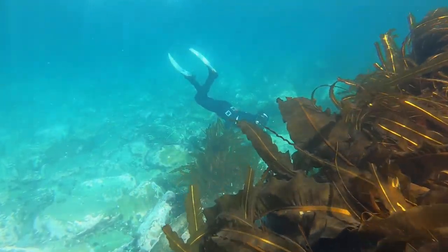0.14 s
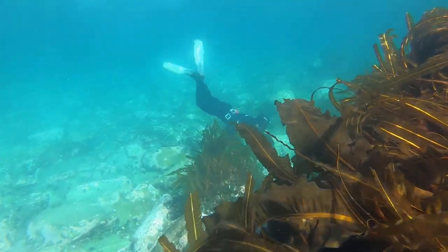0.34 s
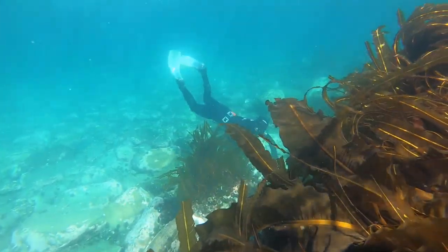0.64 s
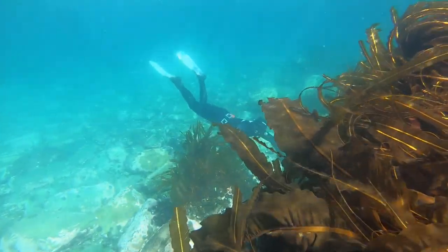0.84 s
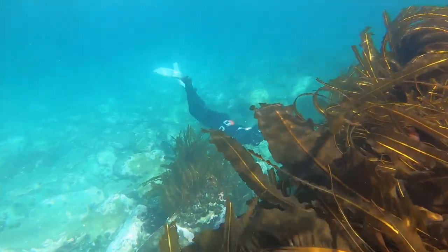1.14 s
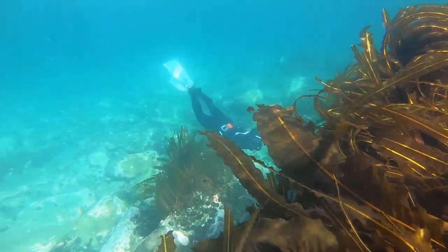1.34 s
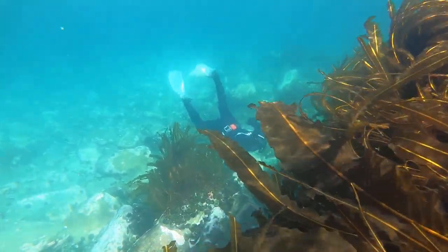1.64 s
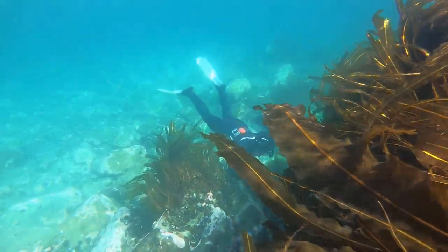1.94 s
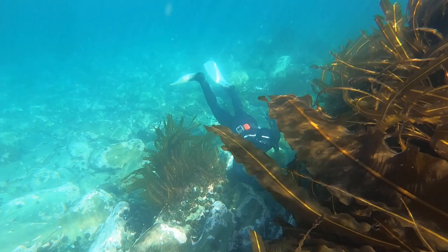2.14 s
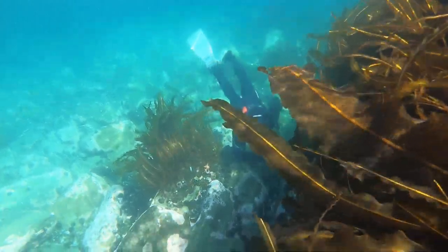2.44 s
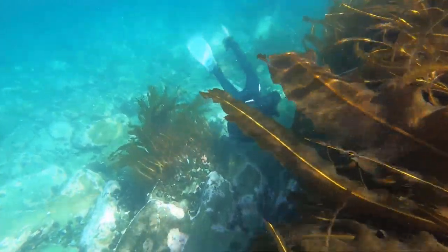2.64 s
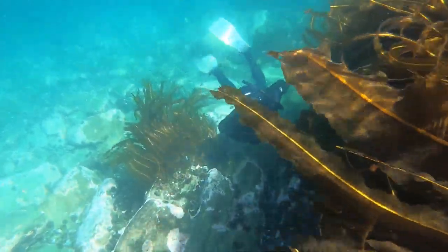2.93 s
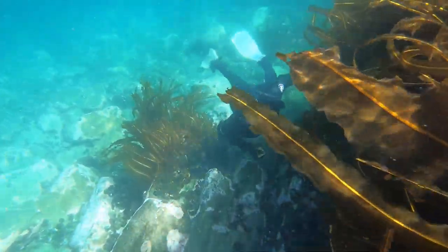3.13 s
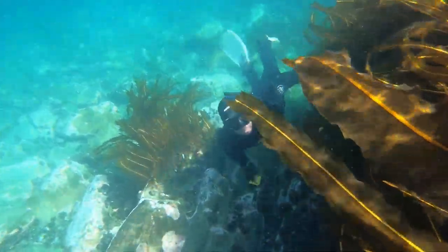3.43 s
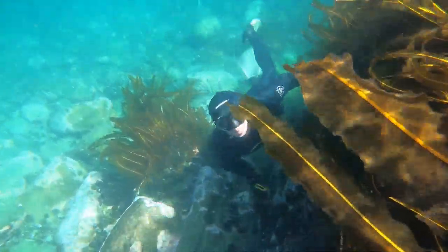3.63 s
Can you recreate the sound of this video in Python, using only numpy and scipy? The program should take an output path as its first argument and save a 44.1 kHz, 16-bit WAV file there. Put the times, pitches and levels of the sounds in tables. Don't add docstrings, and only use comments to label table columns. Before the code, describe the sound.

Muffled water gurgles and hollow bubble blips close by, over soft low rumbling lumps underwater.

```python
import sys
import numpy as np
from scipy import signal
from scipy.fft import rfft, irfft, next_fast_len
from scipy.io import wavfile
from scipy.ndimage import uniform_filter1d, map_coordinates

SR = 44100
rng = np.random.default_rng(int(sys.argv[2]) if len(sys.argv) > 2 else 0)


def nominal_scale(level):
    x = np.asarray(level, float) / 20
    return 10 ** x


def pcm_store(signal):
    levels = np.round(np.clip(np.atleast_2d(signal), -1, 1) * 32767)
    wavfile.write(sys.argv[1], SR, levels.astype(np.int16).T)


N = 166698

# f/Hz, level/dB
HISS_COLOUR = [(3000, -120), (6000, 1), (8500, -6.5), (10000, -6.5), (12500, -10), (14500, -23),
               (15600, -30)]
# f/Hz, level/dB
WASH_COLOUR = [(40, -75), (100, -19), (200, -11), (450, -16), (1300, -15), (3000, -21.5), (4200, -26.5),
               (6500, -20.5), (8600, -33.5), (11000, -49)]
# f/Hz, level/dB
RUMBLE_COLOUR = [(8.8, -51), (15, 5), (47, 3), (67, -6), (100, -24), (130, -14.5), (180, -50), (310, -120)]
# t/s of the peak, length/s, level/dB, f/Hz
SURGES = [(0.086, 0.023, -45, 33.6), (0.151, 0.033, -47, 40), (0.314, 0.026, -35, 43.7),
          (0.364, 0.026, -44, 64.5), (0.436, 0.036, -42, 45.5), (0.507, 0.026, -47.5, 43.3),
          (0.571, 0.022, -53, 31.2), (1.116, 0.024, -51.5, 55.3), (1.246, 0.011, -45, 51.6),
          (1.302, 0.032, -38.5, 43), (1.524, 0.081, -51.5, 32.8), (1.654, 0.023, -48, 33.2),
          (1.72, 0.041, -42, 44), (1.863, 0.016, -47, 35.4), (1.912, 0.09, -47.5, 30.4),
          (1.999, 0.027, -41.5, 32.2), (2.126, 0.076, -43, 33), (2.24, 0.029, -48, 32),
          (2.311, 0.03, -43.5, 32.8), (2.497, 0.03, -46, 58.3), (2.547, 0.015, -48, 30.3),
          (3.07, 0.034, -55, 27), (3.302, 0.07, -52, 36.4), (3.413, 0.038, -39.5, 38.5),
          (3.524, 0.014, -45, 61.4), (3.707, 0.034, -49, 34)]
# t/s, level/dB, time to fade by 60 dB/s
SPRAYS = [
    (0.2261, -48.5, 0.024),
    (1.35, -62, 0.2),
    (2.075, -57, 0.11),
    (2.097, -53, 0.073),
    (2.704, -65, .12),
    (3.358, -56, 0.085),
    (3.729, -56.5, 0.15),
]
# f/Hz, level/dB
SPRAY_COLOUR = [(200, -120), (900, -11), (2000, 7.5), (3400, -3.5), (4200, -9.5), (5500, -4), (8000, -19.5),
                (9200, -120)]
# t/s, peak level/dB, f/Hz
FAINT_TICKS = [(0.27, -51.5, 7100), (0.502, -57, 7100), (0.537, -58, 7230), (0.783, -53, 7270),
               (1.277, -54, 5280), (1.346, -51, 5800), (1.847, -54.5, 7640), (2.097, -56, 5170),
               (2.192, -54.5, 5510), (2.657, -57.5, 5340), (3.14, -59, 5350), (3.209, -58, 5100),
               (3.487, -57, 5400), (3.606, -44.5, 5200), (3.706, -58, 5940), (3.745, -57.5, 5200)]
# t/s, peak level/dB, f/Hz
SMALL_BUBBLES = [(0.003, -57, 713), (0.237, -36, 1584), (0.299, -49, 700), (0.299, -43.5, 2020),
                 (0.455, -44.5, 2040), (0.548, -44.5, 1626), (0.857, -52.5, 1600), (0.862, -55, 707),
                 (1.026, -49, 1954), (1.14, -52, 503), (1.238, -48.5, 2010), (1.315, -46.5, 1310),
                 (1.403, -55, 1330), (1.511, -44, 1520), (1.555, -47.5, 1930), (1.572, -51, 500),
                 (1.634, -59, 491), (1.688, -46.5, 1425), (1.718, -49, 2650), (1.852, -53, 2100),
                 (1.917, -54, 1270), (1.983, -50, 1316), (2.238, -44.5, 1365), (2.285, -40, 740),
                 (2.55, -50, 1553), (2.423, -56, 2260), (2.476, -51.5, 2100), (2.602, -53.5, 2210),
                 (2.68, -58, 3500), (2.71, -56.5, 2450), (2.788, -63, 2780), (2.828, -53, 900),
                 (2.979, -46.5, 1310), (3.035, -44, 1266), (3.085, -48.5, 742), (3.308, -52, 1150),
                 (3.101, -51, 1940), (3.14, -62, 2644), (3.207, -59, 2740), (3.236, -49.5, 2490),
                 (3.269, -44, 1960), (3.305, -55, 2020), (3.36, -46, 800), (3.389, -39, 1297),
                 (3.465, -78, 2770), (3.487, -47.5, 1636), (3.618, -39, 1857), (3.701, -50.5, 1186),
                 (3.701, -49, 1950), (3.742, -33, 1974)]
# t/s, peak level/dB, f/Hz
TICKS = [(0.2242, -52.5, 5880), (0.5581, -56.5, 5770), (0.7412, -54.5, 5780), (1.169, -55.5, 5700),
         (1.3571, -53.5, 6150), (1.9822, -53.5, 3430), (2.0802, -61, 5230), (2.3575, -60, 7100),
         (2.578, -59.5, 5200), (2.837, -52.5, 5030), (3.2256, -59.5, 5400), (3.4303, -58.5, 5330),
         (3.5884, -52.5, 5100), (3.7274, -64, 3230)]
# t/s, peak level/dB, f/Hz, time to fade by 60 dB/s
BUBBLES = [(0.226, -37, 708, 0.11), (0.239, -32.5, 744, 0.075), (0.342, -41, 1970, 0.045),
           (0.419, -43.5, 739, 0.29), (0.447, -35.5, 728.4, 0.19), (0.47, -45.5, 722, 0.13),
           (0.545, -43, 730, 0.15), (0.714, -47.5, 1624, 0.16), (0.778, -46.5, 1270, 0.11),
           (1.133, -38, 1963, 0.066), (1.301, -37.5, 796, 0.052), (1.438, -42, 1617, 0.13),
           (1.505, -40, 710.4, 0.16), (1.719, -41.5, 1540, 0.043), (2.048, -47, 693, 0.37),
           (2.08, -35, 712, 0.065), (2.143, -36.5, 683.5, 0.16), (2.24, -45, 677, 0.29),
           (2.357, -30, 1732, 0.02), (2.655, -39.5, 2220, 0.016), (2.857, -38, 2550, 0.041),
           (2.976, -35.5, 786, 0.039), (3.163, -34.5, 703, 0.072), (3.364, -32.5, 1362, 0.069),
           (3.591, -28.5, 1285, 0.08), (3.619, -31, 1140, 0.081), (3.722, -41, 1346, 0.071),
           (3.743, -28.5, 1310, 0.087)]
# t/s, level/dB
STIR = [(0, -62), (0.216, -67), (0.229, -55), (0.604, -54), (0.661, -73), (.75, -58), (.92, -66),
        (1.35, -55.5), (1.62, -62), (2.04, -65.5), (2.08, -53), (2.24, -58), (2.95, -75.5), (2.98, -65),
        (3.52, -57), (3.568, -68), (3.619, -62), (3.686, -64)]
# t/s of the peak, length/s, ring level/dB, gurgle level/dB
GUSHES = [(0.283, 0.025, -66, -52.5), (0.462, 0.043, -69, -47.5), (0.543, 0.011, -74, -61),
          (1.093, 0.027, -62.5, -91), (1.163, 0.019, -67, -72), (1.3, 0.022, -49, -45),
          (1.511, 0.077, -51.5, -52.5), (2.096, 0.058, -37.5, -37.5), (2.6, 0.21, -64.5, -63),
          (3.072, 0.17, -53.5, -64), (3.197, 0.083, -59, -52), (3.292, 0.068, -54.5, -54),
          (3.467, 0.074, -50.5, -52), (3.662, 0.12, -56, -53)]
# f/Hz, width/Hz, level/dB
HOUSING = [(300, 182, -11), (522, 104, -8.5), (738, 69, -1), (893, 137, -7), (1140, 23, -7),
           (1322, 80, -4.5), (1559, 77, -3), (1930, 157, -7.5), (2475, 287, -20), (2820, 36, -17),
           (3240, 250, -69), (5270, 270, -24.5), (6000, 780, -21.5), (7070, 620, -24.5)]
LEFT_LOUDER = np.array([-5, -8, -11, -3, -2, 6, -11, -1, -3, -4, 0, 4, -3, 0])
LEFT_LEAD = np.array([3.1, 3.1, 2.5, 2.3, 2.3, 1.4, -2.7, .9, -.6, -2.8, .6, .4, .9, .8])

MODES, POCKET_MODES, HIGH_MODES = len(HOUSING), 3, 10
HIGH_STIR_SHARE = 0.42
TICK_T60_S, TICK_RISE_S = 0.012, 0.0005
BUBBLE_RISE_S, BUBBLE_GLIDE = 0.0016, 0.028


def unit(x):
    return x / np.sqrt(np.mean(x ** 2) + 1e-20)


def along(points, hz):
    f, value = np.transpose(points)
    return np.interp(np.log(hz + 1), np.log(f + 1), value)


def wobble(rate, count=1):
    coarse = np.arange(0, N + 64, 64)
    curves = []
    for knots in rng.standard_normal((count, 400)):
        smooth = map_coordinates(knots, [coarse * min(rate, 100) / SR])
        curves.append(np.interp(np.arange(N), coarse, smooth))
    return np.array(curves)


def filtered(x, response):
    m = next_fast_len(N + SR // 2)
    return irfft(rfft(x, m) * response(np.fft.rfftfreq(m, 1 / SR)), m)[..., :N]


def coloured(spectrum, alike):
    a, b = filtered(rng.standard_normal((2, N)), lambda hz: nominal_scale(along(spectrum, hz)))
    turn = np.arccos(np.clip(alike, -1, 1)) / 2
    shared, different = np.cos(turn) * a, np.sin(turn) * b
    return unit(np.array([shared + different, shared - different]))


def peak(f, hz, width):
    return 1j * f * width / (hz * hz - f * f + 1j * f * width)


def ports():
    half_db = np.array(LEFT_LOUDER) / 2
    return np.array([nominal_scale(half_db) * np.exp(1j * np.array(LEFT_LEAD)), nominal_scale(-half_db)])


def rings(rows, trim_db, rise_s, glide):
    out, t = np.zeros((2, N + SR)), np.arange(SR // 4) / SR
    for s, db, hz, t60 in rows:
        nearest = np.argmin(abs(np.log(np.transpose(HOUSING)[0] / hz)))
        pair = ports()[:, nearest]
        rise = 1 - np.exp(-t * hz / (rise_s * 1500))
        rough_db = 4 * map_coordinates(rng.standard_normal(900), [t * min(hz / 7, 3000)], order=1)
        shape = nominal_scale(db + trim_db - 60 * t / t60) * rise * nominal_scale(rough_db)
        tone = shape * np.exp(2j * np.pi * hz * (t + glide * t * t / t60))
        sides = 2 * pair / abs(pair.sum())
        start = round(s * SR)
        out[:, start:start + len(t)] += sides[:, None].dot(tone[None]).imag
    return out[:, :N]


def hiss():
    return nominal_scale(-83.5) * coloured(HISS_COLOUR, 0.01)


def wash():
    return nominal_scale(-66 + wobble(5.36)) * coloured(WASH_COLOUR, -0.42)


def surges():
    t, push = np.arange(N) / SR, np.zeros(N)
    for s, length, db, hz in SURGES:
        u = (t - s) / length
        turn = 2 * np.pi * (hz * (t - s) + rng.random())
        lump = np.exp(-1.6 * u * u) * np.sin(turn)
        tight = 0.24 * np.exp(-3.5 * u * u) * np.sin(2.185 * turn)
        push += nominal_scale(db + 1.5) * (lump + tight)
    rumble = nominal_scale(-58 + 2.3 * wobble(4.1)) * coloured(RUMBLE_COLOUR, 0.9)
    return (push + rumble) * nominal_scale([[-3.25], [3.25]])


def drone():
    hz, width_hz = 182.4, 41.5
    band = [(hz / 4, -120), (hz - 1.66 * width_hz, -12), (hz, 0), (hz + width_hz, -9), (420, -22), (900, -120)]
    t = np.arange(N) / SR
    level = nominal_scale(-59 + 0.52 * wobble(3.71) + wobble(29.9))
    for s, length, _, gurgle_db in GUSHES:
        level = level + nominal_scale(min(gurgle_db, -49) - 9) * np.exp(-2 * ((t - s) / length) ** 2)
    return level * coloured(band, -0.49)


def sprays():
    t = np.arange(N) / SR
    level = sum(nominal_scale(db - 60 * np.abs(t - s) / t60) * (t >= s) for s, db, t60 in SPRAYS)
    jumps = unit(uniform_filter1d(rng.standard_normal(N), size=60))
    spikes = unit(nominal_scale(2 * jumps))
    crackle = level * spikes * coloured([(1, 0)], 0.43)
    return filtered(crackle, lambda hz: nominal_scale(11.5 + along(SPRAY_COLOUR, hz)))


def ticks():
    faint = [(s, db, hz, TICK_T60_S) for s, db, hz in FAINT_TICKS]
    hard = [(s, db, hz, TICK_T60_S) for s, db, hz in TICKS]
    return rings(faint, 1, TICK_RISE_S, 0) + rings(hard, 9.5, TICK_RISE_S, 0)


def small_bubbles():
    rows = [(s, db, hz, 0.017 + 60 / hz) for s, db, hz in SMALL_BUBBLES]
    return rings(rows, 1.5, BUBBLE_RISE_S, BUBBLE_GLIDE)


def bubbles():
    return rings(BUBBLES, -1, BUBBLE_RISE_S, BUBBLE_GLIDE)


def knocks():
    taps, high = np.zeros((MODES, N)), np.arange(MODES) >= HIGH_MODES
    for s, db, *_ in BUBBLES:
        taps[:, round(s * SR)] += nominal_scale(db + 24 + 2 * rng.standard_normal(MODES)) * ~high
    for s, db, *_ in TICKS:
        snap_db = np.where(high, 48, 37.5)
        taps[:, round(s * SR)] += nominal_scale(db + snap_db + rng.standard_normal(MODES))
    return taps


def trickle():
    grains_per_s, grain_s = 420, 0.008
    draw = rng.random((6000, 3))[:int(grains_per_s * N / SR)]
    mode, start = (draw[:, 1] * MODES).astype(int), (draw[:, 0] * N).astype(int)
    grains = np.zeros((MODES, N))
    grains[mode, start] = nominal_scale(np.minimum(-5 * np.log(draw[:, 2]), 10))
    fade = np.exp(-1 / (grain_s * SR))
    return unit(signal.lfilter([1], [1, -fade], grains) * rng.standard_normal(N))


def moving_water():
    s, db = np.transpose(STIR)
    t, mode = np.arange(N) / SR, np.arange(MODES)[:, None]
    level_db = np.interp(t, s, db)
    share = np.where(mode >= HIGH_MODES, HIGH_STIR_SHARE, 1)
    trickle_share = np.where((share < 1) | (mode < POCKET_MODES), 0.45, 1)
    flow = 0.55 * (rng.standard_normal(N) + rng.standard_normal((MODES, N)))
    flow = flow + trickle() * trickle_share
    own_db = 2 * wobble(7.11, count=MODES) + 2 * wobble(30.06, count=MODES) + 2 * wobble(12)
    gain = nominal_scale(level_db.mean() + 22 + share * (level_db - level_db.mean()))
    gain[:POCKET_MODES] *= nominal_scale(-4)
    for s, length, ring_db, gurgle_db in GUSHES:
        swell = nominal_scale(27.5) * np.exp(-2.8 * ((t - s) / length) ** 2)
        gain[:POCKET_MODES] += nominal_scale([[gurgle_db], [gurgle_db], [ring_db]]) * swell
        gain[POCKET_MODES:] += nominal_scale(gurgle_db - 15.5) * swell * share[POCKET_MODES:] ** 2
    return flow * gain * nominal_scale(share * own_db)


def housing(drives):
    wall_top_hz = 8800
    hz, width, db = np.transpose(HOUSING)[..., None]
    m = next_fast_len(N + SR // 4)
    f = np.fft.rfftfreq(m, 1 / SR)
    rung = rfft(drives, m) * peak(f, hz, width) * peak(f, hz, 4 * width) * nominal_scale(db)
    heard = ports() @ rung / (1 + (f / wall_top_hz) ** 20)
    return irfft(heard, m)[:, :N]


def scene():
    background = wash() + surges() + drone()
    loose = sprays() + ticks() + small_bubbles() + bubbles()
    return background + loose + housing(moving_water() + knocks())


def top_cut(x):
    return signal.sosfilt(signal.butter(12, 14900, fs=SR, output="sos"), x)


def record(dry):
    mix = dry + hiss()
    return top_cut(mix)


dry = scene()
out = record(dry)
pcm_store(out)
```